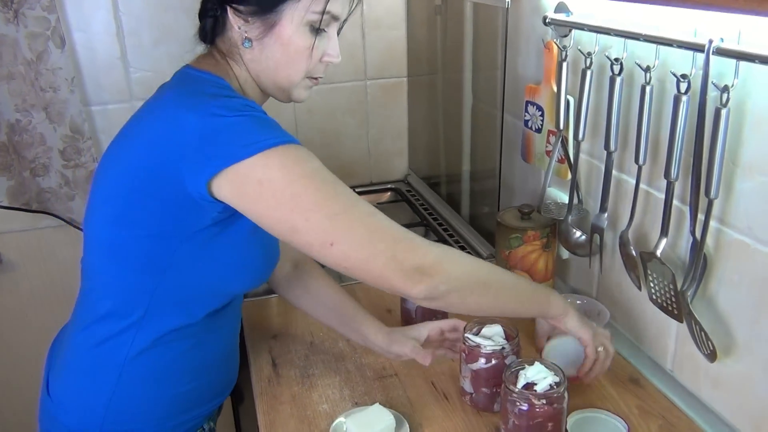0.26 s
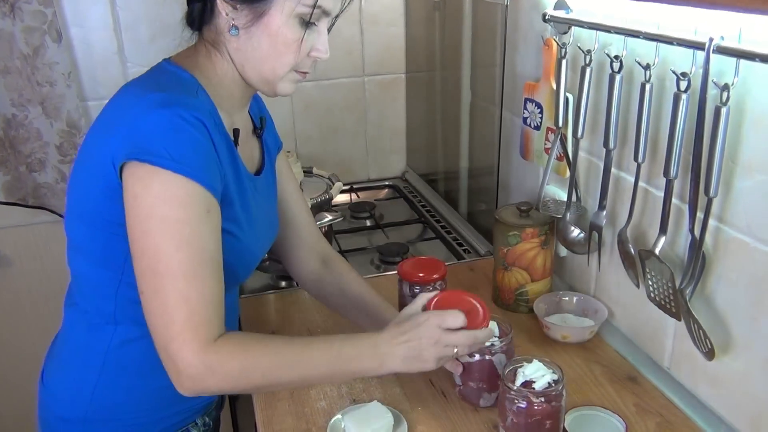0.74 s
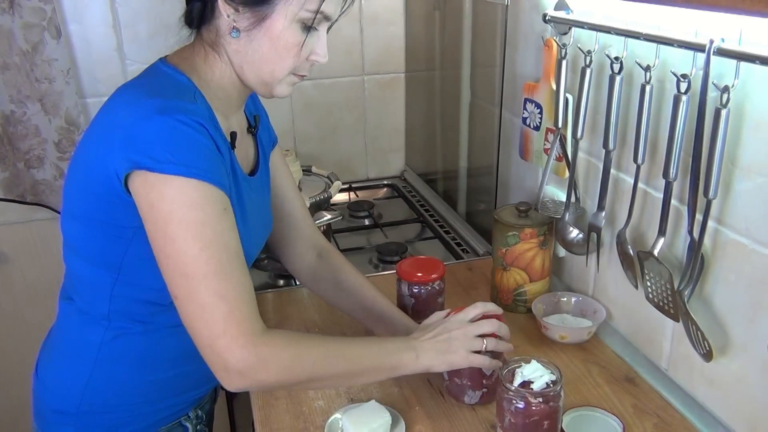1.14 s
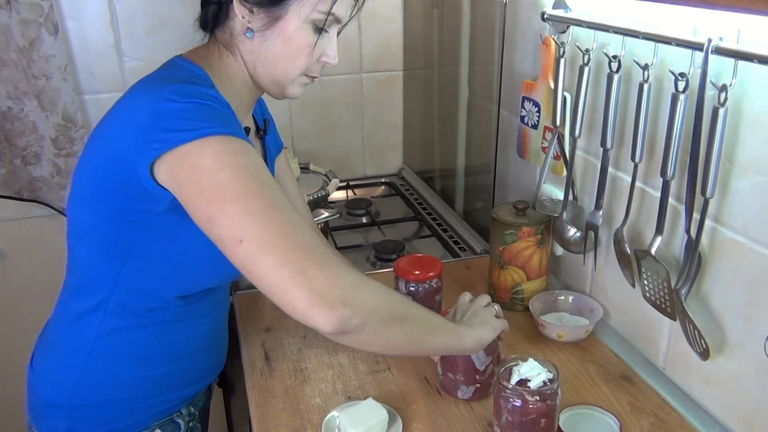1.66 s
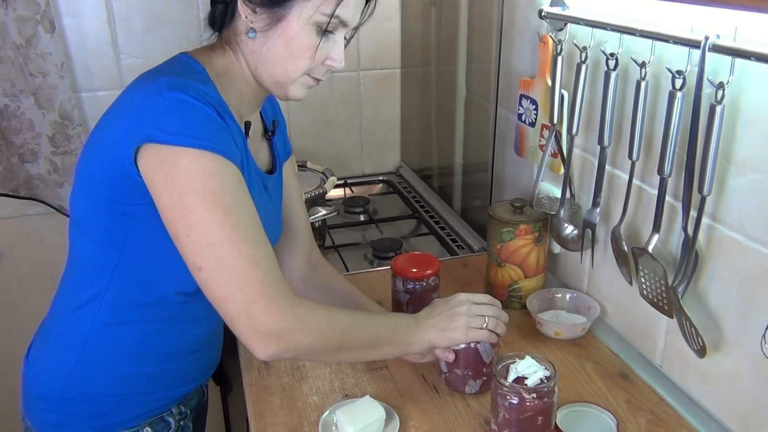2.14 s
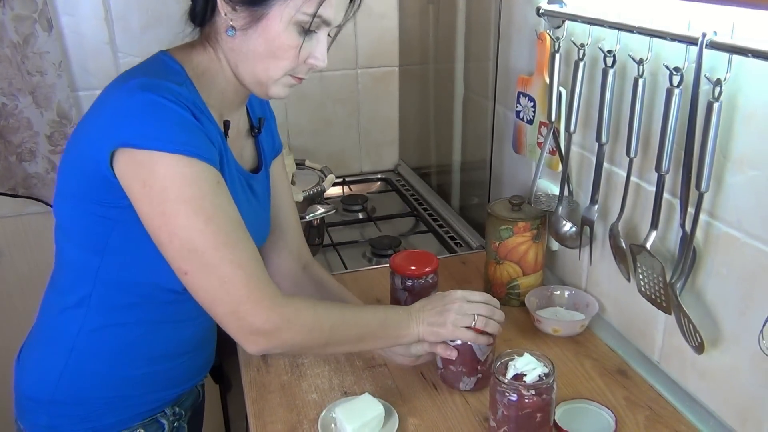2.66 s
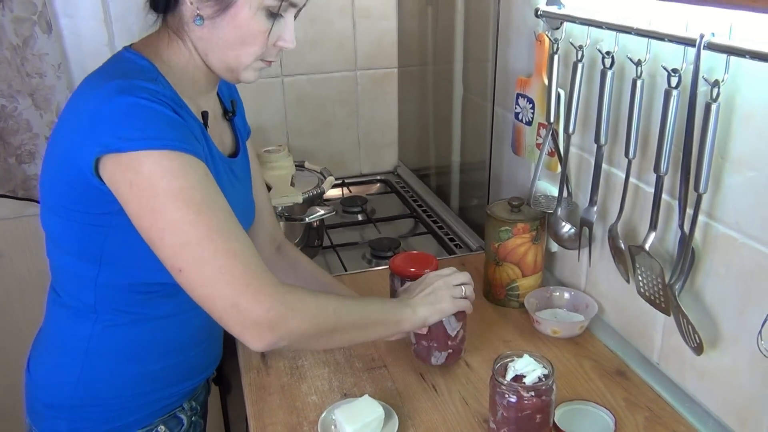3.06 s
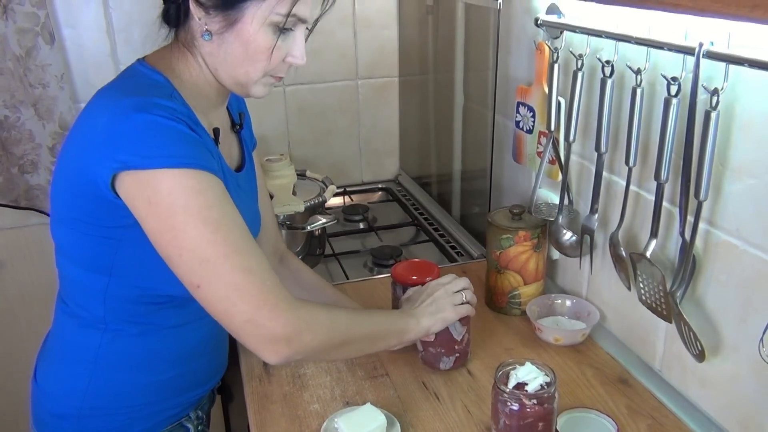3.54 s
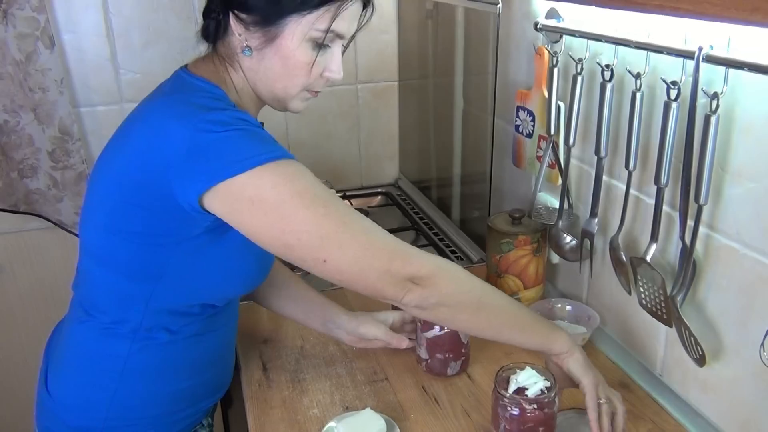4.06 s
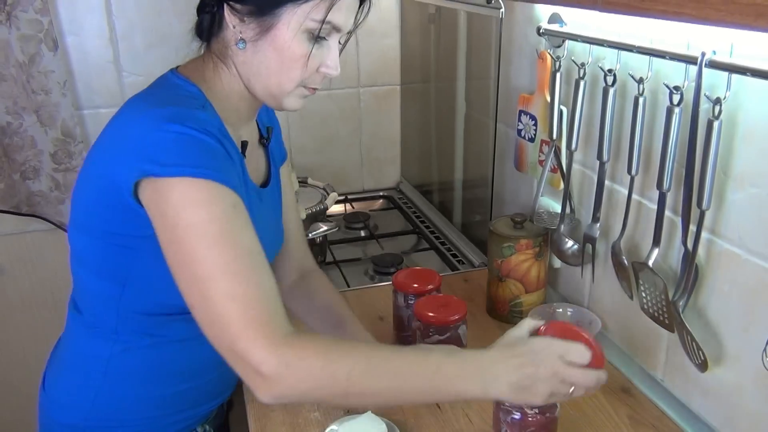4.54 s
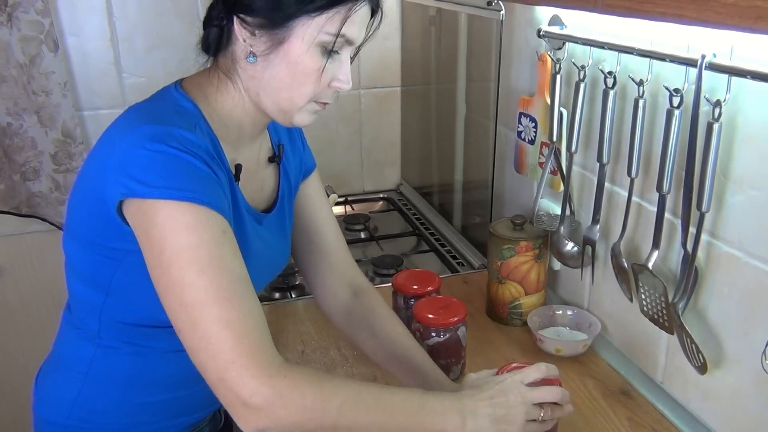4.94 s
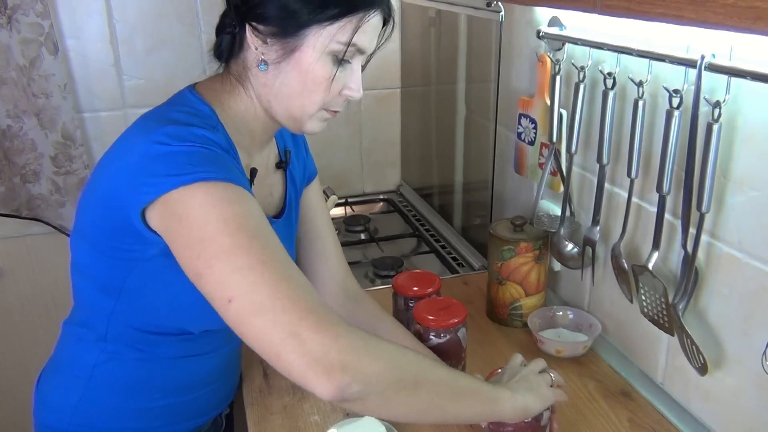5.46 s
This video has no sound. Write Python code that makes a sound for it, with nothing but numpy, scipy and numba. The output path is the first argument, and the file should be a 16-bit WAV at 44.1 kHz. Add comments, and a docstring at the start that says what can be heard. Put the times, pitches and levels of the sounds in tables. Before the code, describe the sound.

In a small tiled kitchen, metal twist-off lids are screwed onto two filled glass jars. First a jar is dragged over the wooden counter, then its lid clinks, grinds and clicks tight. Several wooden knocks and a short slide follow before the second lid rattles onto its rim and scrapes round. Soft hand rustles and a steady, quiet rumble and microphone hiss lie underneath.

```python
"""A metal lid scrapes and ticks faintly as it is picked off a wooden counter in a small tiled kitchen.
A filled glass jar slides closer, rocking; the lid clinks on its rim, grinds along the thread and snaps tight.
The jar is knocked down and pushed away, then a second jar gets its lid. Blows ring rim, lid panel and
counter; stick-slip drives the scrapes and slides. Hands rustle over low room rumble and hiss."""
import sys
import numpy as np
from scipy import signal
from scipy.fft import rfft, irfft
from scipy.io import wavfile
from scipy.ndimage import uniform_filter1d
from numba import njit

SR = 44100
rng = np.random.default_rng(int(sys.argv[2]) if len(sys.argv) > 2 else 0)


def materialize(psi):
    """Save the field psi as 16-bit PCM at rate SR to the path in sys.argv[1].

    A 1-D psi becomes a single channel; in a 2-D psi each row is a channel.
    """
    bounded = np.clip(np.atleast_2d(psi).T, -1, 1)
    quanta = np.round(bounded * 32767).astype(np.int16)
    wavfile.write(sys.argv[1], SR, quanta)


N = 251546

# Levels are relative, ahead of room and mix gains.
# lid on counter, then on thread: t/s, length/s, level/dB
LID_SCRAPES = [(.16, 0.07, -59.5), (1.19, 0.027, -50.5), (1.235, .08, -44.5), (1.327, 0.015, -39),
               (1.36, 0.19, -55), (1.5, 0.19, -53.5), (1.768, 0.07, -37), (1.875, 0.03, -52.5),
               (5.007, 0.024, -39.5), (5.1, 0.056, -45), (5.158, .022, -37), (5.21, 0.019, -33),
               (5.23, 0.11, -49), (5.372, 0.019, -42), (5.44, 0.048, -57), (5.645, 0.059, -44)]
# lid meets glass or is jolted: t/s, panel/dB, rim/dB, tick/dB, chatter/ms
LID_HITS = [(0.166, -60, -59.5, -71, 1.3), (0.2022, -54.5, -59, -51, 1.6), (1.0961, -64, -33, -46, 2.1),
            (1.2229, -31.5, -33.5, -44, 7), (1.262, -32, -45, -53, 6.2), (1.3467, -29, -30, -38.5, 1.5),
            (1.5162, -42.5, -57, -59, 4), (1.5513, -47.5, -70, -67, 3), (1.618, -62, -65, -86, 7),
            (1.767, -50, -76, -79, 4), (1.8244, -32, -39.5, -62, 2.04), (3.2392, -41, -62, -55.5, 0.4),
            (4.545, -80.5, -66, -71, 1.9), (4.751, -85, -65, -81, 3.7), (4.8292, -51, -33.5, -42.5, 4.6),
            (4.853, -50, -47.5, -68, 3.3), (4.927, -54, -52, -60, 3), (5.0068, -39, -43.5, -65, 2.6),
            (5.045, -41, -55, -77, 2.8), (5.118, -42, -59, -64, 1.8), (5.156, -25.5, -38, -38, 4.5),
            (5.204, -35.5, -48, -58, .76), (5.2183, -36.5, -53, -39.5, 6), (5.3812, -49, -56.5, -75, 2.2),
            (5.4217, -36, -42, -38, .66), (5.4332, -50, -71, -70, 1.2), (5.485, -49.5, -51.5, -55, 2.5),
            (5.636, -52, -54.5, -61.5, 3), (5.686, -42.5, -47.5, -56.5, 6.3)]
# per lid: first touch/s, tight/s, loose panel/Hz, tight panel/Hz
LID_TURNS = [(1.116, 1.848, 1262, 950), (4.823, 5.7, 1450, 969)]
# fingers and lid brush past things: t/s, length/s, level/dB
HAND_BRUSHES = [(.17, .13, -57), (.66, 0.5, -62.5), (1.39, 0.29, -57), (1.75, .2, -70), (2.645, 0.078, -58),
                (2.85, 0.059, -60.5), (3.668, 0.024, -51.5), (4.1, 0.11, -48), (4.52, 0.12, -69),
                (4.66, 0.15, -66.5), (5.2, 0.14, -50), (5.65, 0.13, -48.5)]
# jar or lid meets counter: t/s, level/dB, brightness/Hz
COUNTER_KNOCKS = [(0.2022, -53, 2450), (0.513, -62, 2950), (0.7192, -52.5, 1150), (0.7453, -51.5, 1340),
                  (0.8102, -49, 1300), (0.8327, -36, 1100), (1.601, -49, 870), (1.619, -46, 1132),
                  (1.8244, -37, 1290), (2.5379, -60.5, 2000), (2.8415, -53, 1300), (2.8595, -45.5, 1280),
                  (3.2405, -24.5, 3100), (3.501, -45, 1370), (3.661, -38, 1030), (3.7038, -48.5, 705),
                  (3.7679, -65, 1200), (3.8716, -29.5, 1610), (4.0347, -60, 2410), (4.066, -51, 4320),
                  (4.1905, -43.5, 950), (4.2273, -44.5, 750), (5.686, -42.5, 1300)]
# jar pushed over wood: t/s, length/s, level/dB
JAR_PUSHES = [(.58, 0.074, -54.5), (.74, 0.25, -45), (.92, 0.12, -57), (2.845, 0.039, -48.5),
              (4.112, 0.12, -41.5), (4.22, 0.045, -62.5)]

# modes of each lidded glass rim and of a filled jar on the counter: f/Hz, level/dB, t60/s
RIM_ONE_MODES = [(775, -25, 0.076), (1200, -1, 0.11), (1640, -11.5, 0.19), (2130, -29, 0.24),
                 (2450, -5.5, 0.19), (2457, -5, 0.3), (2660, 3.5, 0.15), (3000, -11.5, 0.18),
                 (3290, 4, 0.11), (3375, -4, 0.35), (3910, -1.5, 0.085), (4270, -1, 0.15),
                 (5210, -1, 0.081), (5450, -10, 0.25), (6160, -8, 0.056), (6225, 6, 0.025),
                 (7800, -24, 0.084), (9300, -18, 0.083), (11580, -34.5, 0.087), (14100, -31.5, .07)]
RIM_TWO_MODES = [(1170, -5.5, 0.2), (1650, -7, 0.22), (2360, 6, 0.082), (2410, -5, 0.2), (3254, -4.5, 0.17),
                 (3317, -6, 0.08), (4350, -13, 0.14), (5304, -16.5, 0.32), (6140, -16, 0.11),
                 (6910, -7.5, 0.053), (7050, -13, 0.11), (7250, -4.5, 0.072), (9070, -15, 0.096),
                 (11700, -27, 0.069), (12600, -17, 0.097), (14950, -16, 0.056)]
COUNTER_MODES = [(67, -35, .2), (113.7, -22.5, 0.27), (172.6, -23, 0.029), (208, -25, 0.033),
                 (349, -27.5, 0.13), (439, -15, 0.033), (591.3, 2, 0.024), (649, 0.5, 0.027),
                 (822, -3, 0.02), (1004, -2, 0.016), (1247, -13.5, 0.056), (1520, 2.5, 0.0068),
                 (1750, -13.5, 0.022), (2435, -13.5, 0.0088), (4120, -22.5, 0.0075)]
# lid panel modes: f/panel pitch, level/dB, t60/s
PANEL_MODES = [(0.999, 1, 0.029), (1.35, -14.5, 0.027), (1.95, -5.5, 0.0079)]

# spectra: f/Hz, level/dB
FLOOR_SPECTRUM = [(12, -8), (20, -4), (58, -5.5), (91, -9.5), (422, -22.5), (499, -24.5), (1060, -29),
                  (1220, -31), (1910, -34.5), (2390, -35), (2670, -38), (3250, -36.5), (3740, -40),
                  (16000, -48.5)]  # room rumble, microphone hiss
GRIND_SPECTRUM = [(100, -70), (350, -23), (600, 11.5), (1200, 7), (1900, -6.5), (2500, -3.5), (3000, -22),
                  (3400, -15.5), (6000, -22.5), (15000, -27)]  # lugs on thread
CLACK_SPECTRUM = [(400, -14.5), (900, 15.5), (1700, 3.5), (2600, 9), (3300, 1.5), (3750, -23), (4200, -4.5),
                  (4800, -10), (5400, -23), (7300, -4.5), (8500, -26), (15000, -3)]  # gripped lid
TICK_SPECTRUM = [(500, -69.5), (1500, 8), (3000, -5.5), (6000, 0.5), (8300, -6), (11500, -2), (15500, -36)]  # metal on glass
SKIN_SPECTRUM = [(200, -4), (900, 13.5), (2500, 0.5), (7000, -6), (10000, -8.5), (15000, -13)]  # rubbing fingers
CRACK_SPECTRUM = [(100, -6), (500, 6.5), (1500, -2.5), (3000, 1), (6000, -6), (10000, -14.5), (16000, -38)]  # impact on wood
SHIVER_SPECTRUM = [(100, 4.5), (280, -29), (450, 0.5), (700, -0.5), (1100, 7.5), (1550, 1.5), (1950, 1),
                   (2500, -9), (4000, -53.5), (9000, -35.5)]  # things shaken on the counter
# electronic whine: f/Hz, level/dB
WHINE_BANDS = [(7860, -88), (15700, -116)]
# kitchen reverberation: f/Hz, t60/s, echo re direct/dB
ROOM_BANDS = [(60, 0.74, -10), (126, 0.5, -4), (247, 0.41, 2.5), (660, 0.4, -5.5), (1210, 0.28, -6),
              (2600, 0.37, -2.5), (4970, 0.33, -0.5), (8600, 0.22, -1), (17000, 0.19, -23)]
# counter balance: f/Hz, left minus right/dB
COUNTER_BALANCE = [(60, 4.5), (120, 13.5), (380, 5.5), (700, 6), (1300, -1), (2400, -3.5), (8000, 16.5)]

TIME_S = np.arange(N) / SR
HIT_S = TIME_S[:SR // 2]
SECOND_JAR_S = 4


def undb(db):
    """Decibels to gain."""
    return 10 ** (np.asarray(db) / 20)


def unit(x):
    """Scale to rms 1."""
    return x / np.sqrt(np.mean(x ** 2))


def at_level(x, db):
    """Scale a hit by the rms of its first 16 ms."""
    return x * undb(db) / np.sqrt(np.mean(x[:int(.016 * SR)] ** 2))


def add(track, start_s, x):
    """Mix x into a track."""
    i = int(start_s * SR)
    track[i:i + len(x)] += x[:max(N - i, 0)]


def at_hz(rows, hz, column=1):
    """Interpolate a table column over log frequency."""
    rows = np.array(rows)
    return np.interp(np.log(np.maximum(hz, 1)), np.log(rows[:, 0]), rows[:, column])


def colour(x, spectrum, size=4096):
    """Minimum-phase filter from f/Hz, level/dB points."""
    hz = np.arange(size // 2 + 1) * SR / size
    cepstrum = irfft(np.log(undb(at_hz(spectrum, hz))))
    cepstrum[1:size // 2] *= 2
    cepstrum[size // 2 + 1:] = 0
    return signal.fftconvolve(x, irfft(np.exp(rfft(cepstrum))))[:len(x)]


@njit
def resonate(x, hz, width_hz):
    """State-variable band-pass, tuned per sample."""
    y, band_state, low_state = np.empty(len(x)), 0., 0.
    for i in range(len(x)):
        g, damping = np.tan(np.pi * hz[i] / SR), width_hz / hz[i]
        band = (band_state + g * (x[i] - low_state)) / (1 + g * (g + damping))
        band_state = 2 * band - band_state
        low_state += 2 * g * band
        y[i] = damping * band
    return y


def fade(t60_s):
    """Exponential decay of one hit."""
    return np.exp(-np.log(1000) * HIT_S / max(t60_s, 1e-4))


def burst(t60_s):
    """Decaying noise: dense, damped modes."""
    return rng.standard_normal(len(HIT_S)) * fade(t60_s)


def wander(rate_hz):
    """Interpolated Gaussian noise over one hit."""
    count = max(int(rate_hz * HIT_S[-1]), 2)
    return np.interp(HIT_S, np.linspace(0, HIT_S[-1], count), rng.standard_normal(count))


def ring(modes, t60_scale=1, scatter_db=0, detune=0, waver_hz=0):
    """Decaying modes, weighted by the contact point; a rocking contact makes them waver."""
    out = 0
    for k, (hz, db, t60_s) in enumerate(modes):
        weight, shift = rng.standard_normal(2)
        cycles = np.cumsum(hz * (1 + detune * shift) + waver_hz * wander(200)) / SR
        envelope = undb(db + scatter_db * weight) * fade(t60_s * t60_scale)
        out += (-1) ** k * envelope * np.sin(2 * np.pi * cycles)
    return out


def slips(rate_hz, spread_db):
    """Stick-slip: randomly timed jerks of uneven size."""
    size = undb(spread_db * np.clip(rng.standard_normal(N), -2, 2))
    return (rng.random(N) < rate_hz / SR) * size * rng.choice([-1, 1], N)


def strokes(rows, rise_share, depth_db=15):
    """Rubbing envelope: each stroke is depth_db below its peak at both ends."""
    gain = 0
    for start_s, length_s, db in rows:
        along = (TIME_S - start_s) / length_s
        off_peak = np.maximum((rise_share - along) / rise_share, (along - rise_share) / (1 - rise_share))
        gain += undb(db - depth_db * off_peak)
    return gain


def noise_floor():
    """One channel of room rumble, microphone hiss and thin electronic whine."""
    out = undb(-58) * unit(colour(rng.standard_normal(N), FLOOR_SPECTRUM))
    for hz, db in WHINE_BANDS:
        whine = resonate(rng.standard_normal(N), np.full(N, float(hz)), width_hz=110.)
        out += undb(db) * unit(whine)
    return out


def lid_state(grip_s=.1, gripped_ring=.2, loose_thud_db=-17, tight_thud_db=-.5):
    """Tightening lowers the panel pitch and passes more thud; fingers damp all but the first touch."""
    jar = (TIME_S >= SECOND_JAR_S).astype(int)
    touch_s, tight_s, loose_hz, tight_hz = np.array(LID_TURNS, float)[jar].T
    tightness = np.clip((TIME_S - touch_s) / (tight_s - touch_s), 0, 1)
    panel_hz = loose_hz + (tight_hz - loose_hz) * tightness
    freedom = gripped_ring + (1 - gripped_ring) * np.exp(-np.abs(TIME_S - touch_s) / grip_s)
    thud_db = loose_thud_db + (tight_thud_db - loose_thud_db) * tightness ** 2
    return panel_hz, freedom, thud_db


def lid_scrapes(panel_hz):
    """The lid grinds on counter or thread, driving its panel; lugs wedge slowly, then let go."""
    jerks = slips(rate_hz=1000, spread_db=4.5)
    panel = resonate(jerks, panel_hz, width_hz=260.)
    panel = resonate(panel, panel_hz, width_hz=520.)
    grind = colour(jerks, GRIND_SPECTRUM)
    return strokes(LID_SCRAPES, rise_share=.62) * (unit(panel) + unit(grind))


def lug_chatter(length_ms, skips=14):
    """Force of a lug touching glass, then skipping over it."""
    n = int(length_ms * SR / 1000) + 2
    force = np.zeros(n)
    force[0] = 1
    skip_at = 1 + (rng.random(skips) * (n - 1)).astype(int)
    force[skip_at] += .35 * length_ms * rng.choice([-1, 1], skips)
    return force


def lid_hits(panel_hz, freedom, thud_db):
    """Each contact ticks, rings rim and panel, and thuds into the counter. Returns lid, thuds."""
    lid, thuds = np.zeros(N), np.zeros(N)
    for start_s, panel_db, rim_db, tick_db, chatter_ms in LID_HITS:
        i = min(int(start_s * SR), N - 1)
        force = lug_chatter(chatter_ms)
        swell = 1 - fade(.0013 * chatter_ms)  # modes build while the lug skips
        rim_modes = RIM_ONE_MODES if start_s < SECOND_JAR_S else RIM_TWO_MODES
        rim = swell * ring(rim_modes, t60_scale=freedom[i], scatter_db=1, detune=.001, waver_hz=40)
        panel = swell * ring([(panel_hz[i] * ratio, db, t60_s) for ratio, db, t60_s in PANEL_MODES])
        clack = colour(burst(.0058) + .46 * burst(.036), CLACK_SPECTRUM)
        tick = colour(burst(.0054) + .18 * burst(.05), TICK_SPECTRUM)
        # grip trades ring for clack
        add(lid, start_s, at_level(rim, rim_db - 7.5 + 7 * freedom[i]))
        add(lid, start_s, at_level(signal.lfilter(force, 1, clack), rim_db + 1.5 - 5 * freedom[i]))
        add(lid, start_s, at_level(signal.lfilter(force, 1, tick), tick_db))
        add(lid, start_s, at_level(panel, panel_db))
        add(thuds, start_s, at_level(ring(COUNTER_MODES, scatter_db=4.5), panel_db + thud_db[i]))
    bass_cut = signal.butter(1, 180, "high", fs=SR)  # little bass reaches the counter
    return lid, signal.lfilter(*bass_cut, thuds)


def hand_rustle():
    """Fine dry grains of skin and metal rubbing."""
    grains = colour(slips(rate_hz=8000, spread_db=5.5), SKIN_SPECTRUM)
    return unit(grains) * strokes(HAND_BRUSHES, rise_share=.35)


def counter_knocks(rows):
    """Jar or lid hits wood and things on the counter shiver; softer contacts lose treble."""
    out = np.zeros(N)
    for start_s, db, bright_hz in rows:
        crack = colour(fade(.0001) + .0063 * burst(.0023), CRACK_SPECTRUM)
        body = ring(COUNTER_MODES, scatter_db=4.5, detune=.0033)
        shiver = colour(burst(.5), SHIVER_SPECTRUM)
        knock = at_level(body, -2.4) + at_level(crack, -7) + at_level(shiver, -16.5)
        soften = signal.butter(2, .88 * bright_hz, fs=SR)
        add(out, start_s, at_level(signal.lfilter(*soften, knock), db - 1))
    return out


def jar_slide():
    """The base judders over wood, shaking the counter and rasping; a push starts fast and runs out."""
    jerks = slips(rate_hz=900, spread_db=4)
    body = signal.fftconvolve(jerks, ring(COUNTER_MODES))[:N]
    body = signal.lfilter(*signal.butter(1, 1500, fs=SR), body)
    rasp = colour(jerks, SHIVER_SPECTRUM)
    return (unit(body) + undb(-9) * unit(rasp)) * strokes(JAR_PUSHES, rise_share=.22)


def jar_rocking(start_s=.871, period_s=.039, first_db=-43, loss_db=1.5, bright_hz=800):
    """Knock rows of the dragged jar rocking on its base, evenly and ever weaker."""
    return [(start_s + k * period_s, first_db - k * loss_db, bright_hz) for k in range(5)]


def level_out(response, bands):
    """Set a room response's smoothed power to direct plus echo; keep its fine ripple."""
    hz = np.arange(1, len(response) // 2 + 1) * SR / len(response)
    power = uniform_filter1d(np.abs(rfft(response)[1:]) ** 2, size=45)
    wanted = 1 + undb(at_hz(bands, hz, column=2)) ** 2
    return colour(response, np.column_stack([hz, 10 * np.log10(wanted / power)]))


def kitchen(x, left_lag_ms, early_db, treble_echo_db=0):
    """Direct sound, early treble scatter off tiles and jars, and a separate diffuse tail per ear."""
    t = TIME_S[:int(.7 * SR)]
    hz = np.arange(len(t) // 2 + 1) * SR / len(t)
    bands, ears = np.array(ROOM_BANDS, float), []
    bands[:, 2] += treble_echo_db * (bands[:, 0] > 2000)
    for lag in (int(left_lag_ms * SR / 1000), 0):
        phases = np.exp(2j * np.pi * rng.random(len(hz)))
        response = np.zeros(len(t))
        for selector, (_, t60_s, db) in zip(np.eye(len(bands)), bands):
            band_gain = np.interp(np.log(hz + 1), np.log(bands[:, 0]), selector)
            envelope = np.exp(-np.log(1000) * t / t60_s) * (1 - np.exp(-t / .0017))
            response += undb(db) * irfft(phases * band_gain, len(t)) * unit(envelope)
        early = rng.standard_normal(len(t)) * np.exp(-t / .002)
        early = signal.lfilter(*signal.butter(2, 1200, "high", fs=SR), early)
        response += undb(early_db) * early / np.linalg.norm(early)
        response[lag] += 1  # direct path
        ears.append(signal.fftconvolve(x, level_out(response, bands))[:N])
    return np.array(ears)


def scene():
    """Lids centre, counter mostly left, one room."""
    panel_hz, freedom, thud_db = lid_state()
    hits, thuds = lid_hits(panel_hz, freedom, thud_db)
    lids = kitchen(hits + lid_scrapes(panel_hz) + hand_rustle(), left_lag_ms=.03, early_db=7)
    wood = counter_knocks(list(COUNTER_KNOCKS) + jar_rocking()) + jar_slide() + thuds
    # a low source sends less treble up into the room
    wood = kitchen(wood, left_lag_ms=.17, early_db=1, treble_echo_db=-9.5)
    for ear, side in enumerate((1, -1)):
        wood[ear] = colour(wood[ear], [(hz, side * db / 2) for hz, db in COUNTER_BALANCE])
    floor = np.array([noise_floor(), noise_floor()])
    return undb(-1.5) * lids + undb(1.5) * wood + floor


def record(dry):
    """Steep low-pass at 16 kHz."""
    return signal.sosfilt(signal.ellip(10, .2, 80, 16000, fs=SR, output="sos"), dry)


dry = scene()
out = record(dry)
materialize(out)
```